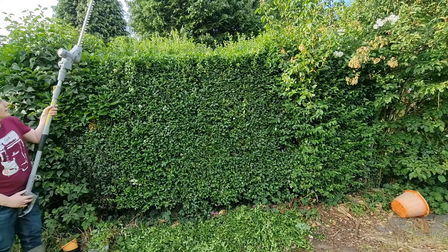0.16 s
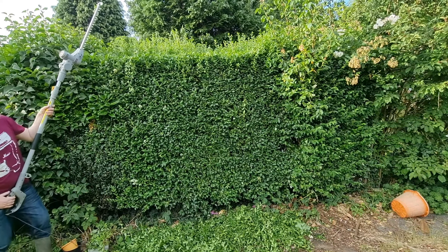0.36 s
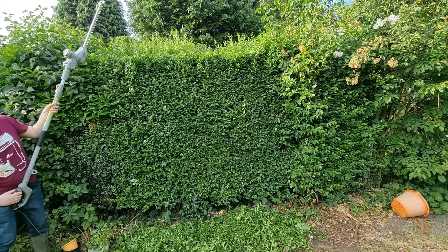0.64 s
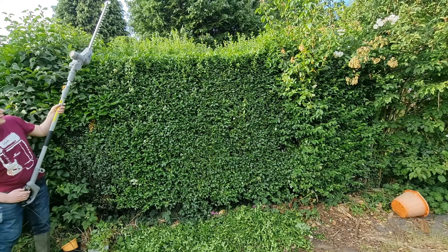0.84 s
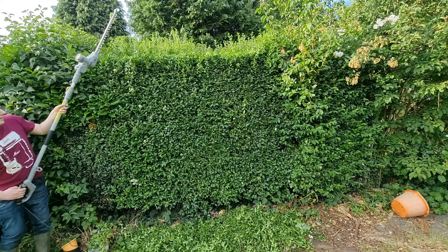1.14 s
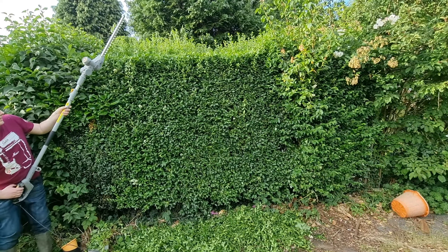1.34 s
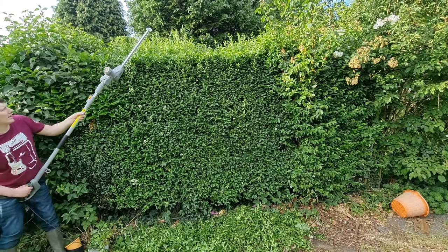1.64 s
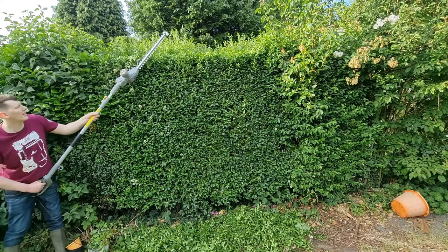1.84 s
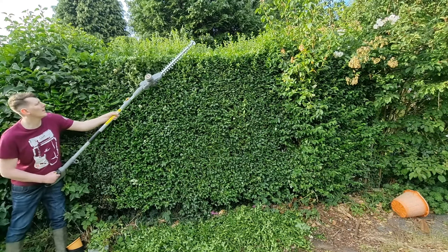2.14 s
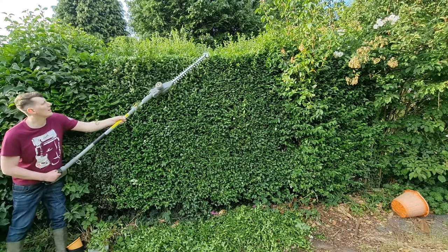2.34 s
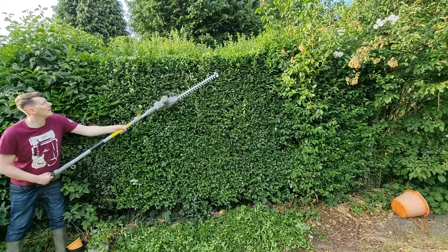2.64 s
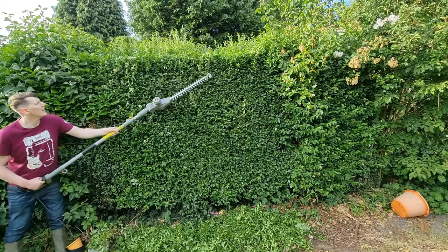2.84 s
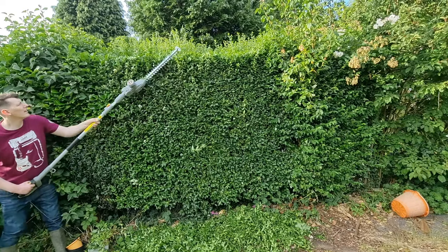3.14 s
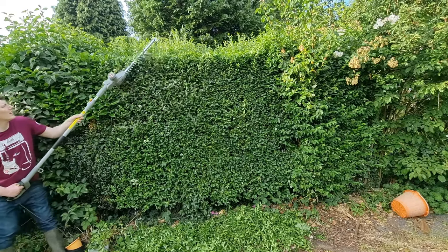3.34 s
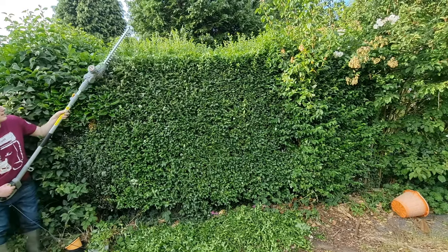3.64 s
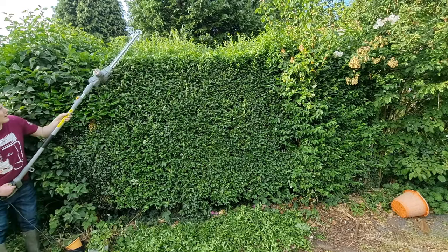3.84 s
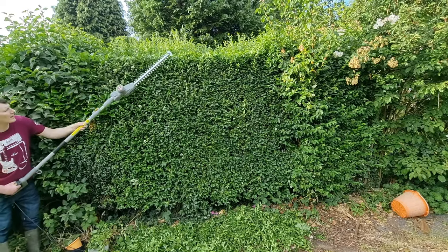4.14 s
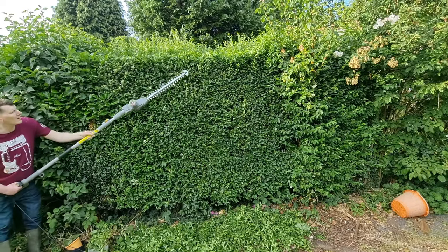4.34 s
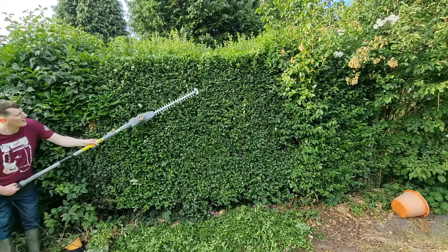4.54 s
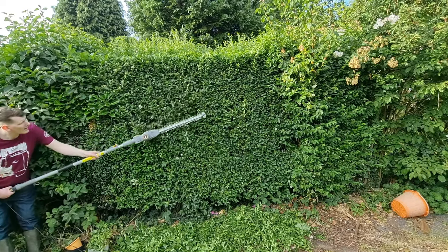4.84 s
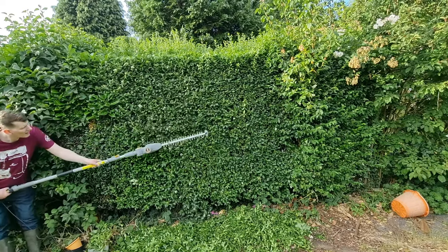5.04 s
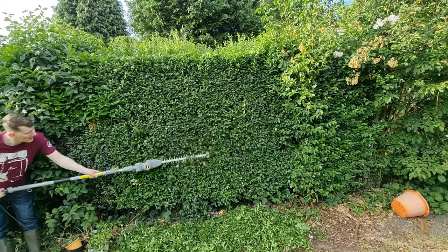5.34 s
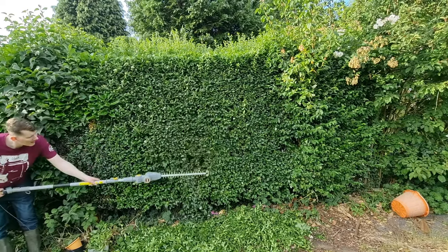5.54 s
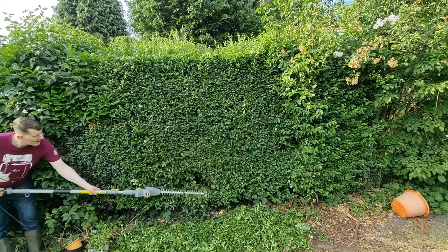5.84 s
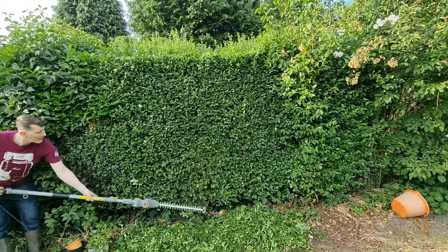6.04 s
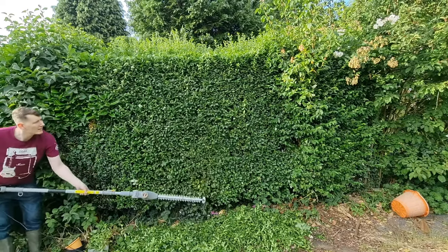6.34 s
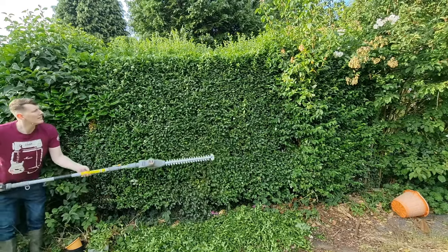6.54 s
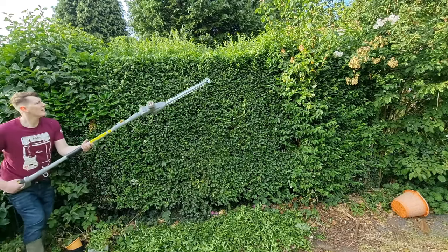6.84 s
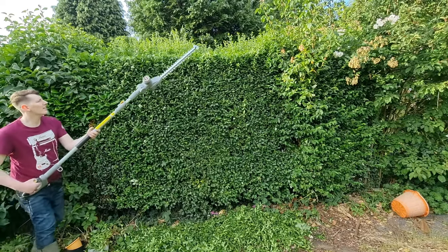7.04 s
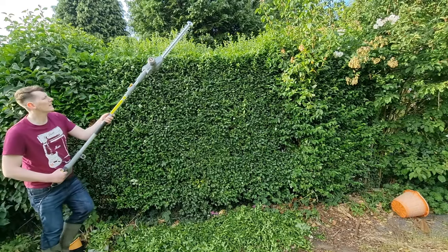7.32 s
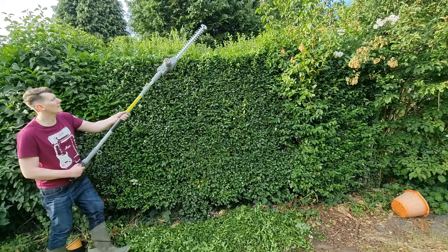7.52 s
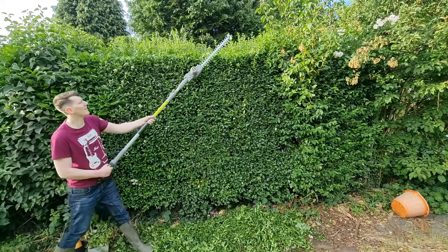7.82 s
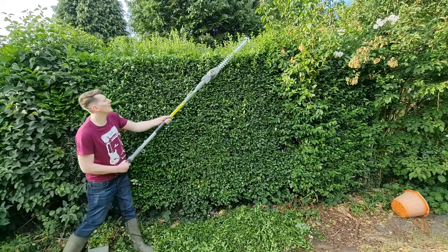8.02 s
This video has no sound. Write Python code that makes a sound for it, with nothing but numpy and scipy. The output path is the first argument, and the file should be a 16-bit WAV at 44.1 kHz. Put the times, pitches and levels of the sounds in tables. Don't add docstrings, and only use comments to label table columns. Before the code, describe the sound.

A near-silent outdoor opening holds soft leaf scrapes, small crisp ticks and a faint sleeve rub. Just after one second a long-reach electric trimmer switches on, quickly rising to a loud, dense, steady buzz with whining gears and rapidly chattering blades. Twigs crack, loudest past the middle, while lawn reflections give a sliding hollow colour. It never stops. Stereo pickup from a few metres, open air, little reverberation.

```python
import sys
import numpy as np
from scipy import signal
from scipy.fft import rfft, irfft, next_fast_len
from scipy.io import wavfile
from scipy.ndimage import uniform_filter1d, map_coordinates

SR = 44100
rng = np.random.default_rng(int(sys.argv[2]) if len(sys.argv) > 2 else 0)


def to_wav(sig):
    pcm = np.clip(np.atleast_2d(sig), -1, 1) * 32767
    pcm = np.round(pcm).astype(np.int16)
    wavfile.write(sys.argv[1], SR, pcm.T)


def convert_level_to_amplitude(level_db):
    exponent = np.asarray(level_db, float) / 20
    return 10 ** exponent


N = 360738
FULL_HZ = 430
STROKES_PER_TURN = 0.14
GEARS_ENGAGE_S = 1.183


# (time [s], speed [turns/s])
SPEED = [(1.27, 411), (1.38, 430), (1.65, 426), (1.95, 426), (2.25, 429.5), (2.6, 427.5), (3.3, 442),
         (3.5, 441.5), (3.9, 446), (4.3, 431.4), (4.5, 428.6), (4.7, 433.3), (5.1, 435.8), (5.9, 426),
         (6.1, 427.2), (6.45, 435), (7.3, 422.4), (8.18, 416.8)]


def motor():
    switch_s, switch_rise_s, spin_from_s, spin_up_s = 1.133, 0.008, 1.093, 0.19
    t = np.arange(N) / SR
    spin_up = 1 - np.exp(-np.maximum(t - spin_from_s, 0) / spin_up_s)
    hz = curve(SPEED)[0] * spin_up * np.clip((t - switch_s) / switch_rise_s, 0, 1)
    return hz, 2 * np.pi * np.cumsum(hz) / SR


# (time [s], shaft level [dB], gear level [dB])
WHINE = [(1.5, -34.5, -26), (2, -35.5, -23.5), (2.5, -39.5, -23.5), (3, -37.5, -27.5), (3.5, -39.5, -25),
         (4, -43.5, -25.5), (4.4, -33.5, -25.5), (4.8, -47, -27.5), (5.2, -41.5, -26), (5.6, -37, -26.5),
         (6.1, -37.5, -27), (6.45, -36, -30), (6.8, -38.5, -26), (7.2, -38, -23.5), (7.6, -39, -28),
         (8.18, -38, -28)]
# (multiple of shaft speed, level [dB], lower side tone [dB], upper side tone [dB])
MESH = [(2, -16, -12, -12), (3, -15, -12, -8), (4, -4.5, -7, -4), (5, 0, -6.5, -7), (6, -9, -1, -10),
        (7, -20, 0, -6), (10, -15, -14, -14), (11, -20, -3, -4), (12, -22, -9, -9), (14, -19, -7, -6),
        (15, -20, -5, -7)]


def whine(hz, turn):
    shaft_power, mesh_power = 2.8, 2.3
    commutator_bars, commutator_db = 40, -37
    shaft_db, mesh_db = curve(WHINE)
    stroke = STROKES_PER_TURN * turn
    speed = hz / FULL_HZ
    out = speed ** shaft_power * convert_level_to_amplitude(shaft_db + 0.81 * wander(hz=18)) * np.cos(turn)

    rising = (hz / 350) ** 3 * np.clip((402 - hz) / 25, 0, 1)
    brush_level = convert_level_to_amplitude(commutator_db + 2.5 * wander(hz=28)) * rising
    out += brush_level * np.cos(commutator_bars * turn + 0.8 * wander(hz=28))

    for k, db, lower_db, upper_db in MESH:
        angle = k * turn + 0.06 * k * wander(hz=8) + 2 * np.pi * rng.random()
        lower = convert_level_to_amplitude(lower_db + 1.6 * wander(hz=4))
        upper = convert_level_to_amplitude(upper_db + 1.6 * wander(hz=4))
        level = speed ** mesh_power * convert_level_to_amplitude(mesh_db + db + 1.6 * wander(hz=3))
        out += level * (np.cos(angle) + lower * np.cos(angle - stroke) + upper * np.cos(angle + stroke))
    first_turns = np.clip(turn / (2 * np.pi * 12), 0, 1) ** 2
    return np.sqrt(2) * out * first_turns


# (time [s], gear case nearness [dB], cutting load [dB], pole shake [dB])
WORK = [(1.24, -1.5, -0.5, 5), (1.45, 0.5, -4.5, 3), (1.72, 1, -2.5, 3), (2.15, -.5, -0.5, 3),
        (2.8, 0, 0.5, 3), (3.23, -0.5, 1, -1), (3.55, 1, -1, -3.5), (3.8, 1, -1.5, 3), (4.5, -.5, -1.5, -1),
        (5.5, 0, -0.5, 7.5), (5.9, 0.8, 0, -15), (6.4, -0.3, -2, -7), (7, 0.5, 1, 1), (7.4, -0.5, 1, -8),
        (8.18, -2, 0, -14)]
# (frequency [Hz], level [dB])
CASE = [(250, -32), (330, -8.5), (430, -8), (600, -3.5), (1400, 1), (2300, -2), (2900, -3.5), (4000, -10.5),
        (5500, -26.5)]
# (frequency [Hz], level [dB])
BLADES = [(2000, 0), (4000, 0), (6000, 1), (7500, -0.5), (8800, -2), (11000, -4.5), (12500, -2.5),
          (13700, -2.5), (15500, -8.5), (16300, -55)]
# (frequency [Hz], level [dB])
THRUM = [(120, -35), (170, -16), (200, -8), (260, -1.5), (330, 3.5), (420, -7)]
# (time [s], level [dB])
TWIGS = [(2.0122, -16), (2.2661, -17), (2.528, -12), (3.2938, -6), (4.053, -4), (4.4801, -17),
         (4.5883, -23), (5.535, 7.5), (5.85, 10), (5.8994, -6), (6.8267, -1.5), (6.913, -15), (7.3146, -11),
         (8.1638, 2.5)]


def cutter(hz, turn):
    case_db, blades_db, thrum_db, thrum_lumps_db = -19, -23, -49.5, 3.5
    blade_power, thrum_power = 1.82, 2.3
    engaged_s, engage_db_per_s = 1.206, 487
    near_db, load_db, shake_db = curve(WORK)
    stroke, speed, t = STROKES_PER_TURN * turn, hz / FULL_HZ, np.arange(N) / SR
    throb = evened(np.cos(stroke) + 0.059 * np.cos(stroke / 2 + 1) + 1.3 * np.cos(2 * stroke))

    rattle = convert_level_to_amplitude(0.39 * throb + 2.2 * np.cos(turn)) * crackle(3000, spread_db=2.5, share=0.34)
    case = evened(colour(rattle, CASE))
    slicing = convert_level_to_amplitude(0.35 * throb + 0.6 * wander(hz=13)) * crackle(2500, spread_db=5.0, share=0.22)
    blades = evened(colour(slicing, BLADES))
    thrum = evened(colour(rng.standard_normal(N), THRUM))
    twigs = convert_level_to_amplitude(-9.5) * colour(ticks(TWIGS, t60=0.0028), BLADES)

    slack = np.clip((t - GEARS_ENGAGE_S) / 0.014, 0.15, 1)
    not_engaged_db = engage_db_per_s * np.maximum(engaged_s - t, 0)
    case *= (hz > 0) * slack * convert_level_to_amplitude(case_db + near_db + 0.5 * wander(hz=2.5) - not_engaged_db)
    blades *= speed ** blade_power * convert_level_to_amplitude(blades_db + load_db)
    thrum *= slack * speed ** thrum_power * convert_level_to_amplitude(thrum_db + shake_db + thrum_lumps_db * wander(hz=8.3))
    return case + blades + thrum + twigs


# (start [s], hold [s], level [dB], crisp upper leaves [rel.
# dB], sleeve and pole [rel. dB])
RUSTLE = [
    (0, 0.064, -49, -3, -17.5),
    (0.4, .02, -55, -14, -21),
    (.5, 0.045, -62, -10, -17),
    (0.622, 0.055, -60, -9, -18),
    (0.685, 0.013, -56, -11, -4),
    (0.746, 0.017, -60, -3, -24),
    (0.78, 0.011, -44, -5, -25),
    (0.872, 0.0036, -74, 4, -28),
    (1.158, .008, -45, -14, -27),
]
# (frequency [Hz], level [dB])
LEAF = [(1800, -18.5), (2800, -6.5), (4000, -11), (5500, -5.5), (7500, -9), (9500, -23)]
# (frequency [Hz], level [dB])
CRISP = [(6500, -14), (8500, -5), (10000, -1), (13000, -2), (16000, -8)]
# (frequency [Hz], level [dB])
SLEEVE = [(150, -3), (300, 0), (800, 1), (1500, 2), (2500, -5), (3200, -21)]
# (time [s], level [dB])
SNAPS = [(0.0528, -22), (0.388, -50), (0.394, -41), (0.423, -46), (0.6449, -42), (0.6569, -40),
         (0.7472, -33.5), (0.7592, -29), (0.7776, -23), (0.783, -24), (0.8135, -26.5), (0.8599, -43),
         (0.8804, -41), (0.921, -56), (0.9767, -60), (0.9896, -56), (1.0874, -63), (1.1174, -56),
         (1.1378, -49)]


def rustle():
    rise_db_per_s, fall_db_per_s, stir_db, murmur_db = 802, 338, 4.5, -93
    start, hold, db, crisp_db, sleeve_db = np.transpose(RUSTLE)
    leaf = swells(start, hold, db, rise_db_per_s, fall_db_per_s)
    crisp = swells(start, hold, db + crisp_db, rise_db_per_s, fall_db_per_s)
    rub = swells(start, hold, db + sleeve_db, rise_db_per_s, fall_db_per_s)
    stir = convert_level_to_amplitude(curve(AIR)[0] + stir_db)
    grains = convert_level_to_amplitude(2.0 * wander(hz=28)) * crackle(900, spread_db=3.5, share=0.33)
    leaves = (leaf + stir) * evened(colour(grains, LEAF)) + (crisp + stir) * evened(colour(grains, CRISP))
    rub_level = rub + convert_level_to_amplitude(-4) * stir + convert_level_to_amplitude(murmur_db)
    sleeve = rub_level * evened(colour(rng.standard_normal(N), SLEEVE))
    snaps = ticks(SNAPS, t60=0.004)
    return leaves + sleeve + convert_level_to_amplitude(4.5) * (colour(snaps, LEAF) + colour(snaps, CRISP))


# (time [s], level [dB], pitch [Hz], time to fall 60 dB [s])
BUMPS = [(.4, -58, 88.5, .12), (.495, -55, 800, .05), (.525, -68, 870, .05), (0.686, -53, 260, .06),
         (.69, -47, 695, .05), (.976, -56, 5900, 0.087), (.99, -59, 6300, .08), (.2, -64, 6500, .08),
         (.26, -66, 95, .3), (3.74, -37, 160, .1), (3.765, -36, 189, 0.2), (7.38, -48, 180, .1),
         (7.9, -52, 75, .12), (8.172, -33, 120, .05)]


def bumps():
    out, t = np.zeros(N), np.arange(6000) / SR
    for (s, db, hz, t60), noise in zip(BUMPS, rng.standard_normal((len(BUMPS), 6000))):
        part = out[round(s * SR):][:6000]
        cycles = np.cumsum(hz * (1 + 0.9 * uniform_filter1d(noise, size=150))) / SR
        swell_in = np.minimum(t * hz / 2.2, 1) ** 2
        ring = convert_level_to_amplitude(db - 60 * t / t60) * swell_in * np.sin(2 * np.pi * cycles)
        part += ring[:len(part)]
    return out


# (time [s], right port lag [ms], ground bounce lag [ms])
PATH = [(.2, .25, 4.8), (.45, .21, 4.8), (1.25, .24, 4.8), (1.65, .21, 4.75), (2.45, .13, 4.48),
        (2.92, .113, 4.08), (3.5, .188, 4.54), (4.0, .214, 4.58), (4.45, .165, 4.23), (4.85, .152, 3.52),
        (5.25, .136, 2.8), (6.05, .134, 1.54), (6.35, .13, 1.22), (6.6, .127, 1.7), (7.1, .148, 4.1),
        (7.3, .146, 4.75), (7.65, .128, 4.9), (8.18, .04, 4.72)]
# (frequency [Hz], level [dB])
LAWN = [(200, -5), (1200, -9.5), (2500, -8), (4000, -13.5), (10000, -5.5)]
# (frequency [Hz], left minus right [dB])
PORTS = [(150, -3), (300, 1), (700, 1.5), (1400, 4), (2200, 0.5), (3500, 0.5), (5000, -2), (6500, -2.5),
         (8000, 4.5), (9500, 0.5), (11500, 4.5), (13000, -8), (15000, 7)]
# (time [s], extra scatter [dB])
BURIED = [(1.1, 1), (1.5, 4), (2.4, -2.5), (3.2, 0), (3.6, 0.5), (4.4, 4.5), (5, 3), (6.7, 4), (7.05, -0.5),
          (7.7, -2.5), (8.18, 4.5)]


def garden(tones, noises):
    port_ms, ground_ms = curve(PATH)
    x = tones + noises
    bounce = convert_level_to_amplitude(-0.6 * curve(BURIED)[0]) * colour(x, LAWN, shut=False)
    left = x + late(bounce, ground_ms)
    right = far_port(x + late(bounce, ground_ms - 0.46 * port_ms), port_ms)
    # whine, bumps and whistle scatter 8 dB less than the noises, so they stay clear
    both = np.array([left, right]) + scatter(convert_level_to_amplitude(-8) * tones + noises)
    f, db = np.transpose(PORTS)
    left_shape, right_shape = np.transpose([f, db / 2]), np.transpose([f, -db / 2])
    return np.array([colour(both[0], left_shape, shut=False), colour(both[1], right_shape, shut=False)])


# (frequency [Hz], factor on the port lag)
BEND = [(350, 1.9), (700, 1.75), (1400, 1.15), (2050, .95), (2750, 1.08), (3450, 1.12), (4150, .99),
        (4800, .93), (5900, 1.0), (7200, 1.05), (9000, 1.01)]


def far_port(x, ms):
    hz, t, z = signal.stft(x, SR, nperseg=512, noverlap=384)
    f, bend = np.transpose(BEND)
    lag_s = np.outer(np.interp(hz, f, bend), np.interp(t * SR, np.arange(N), ms)) / 1000
    delayed = z * np.exp(-2j * np.pi * hz[:, None] * lag_s)
    return signal.istft(delayed, SR, nperseg=512, noverlap=384)[1][:N]


# (frequency [Hz], level [dB])
SCATTER = [(250, -23.5), (600, -9.5), (1400, -11.5), (2100, -13), (3500, -6.5), (5000, -3.5), (7200, -7.5),
           (9500, -5.5), (12000, -1.5), (15000, 0)]


def scatter(x):
    z = signal.stft(convert_level_to_amplitude(curve(BURIED)[0]) * x, nperseg=256, noverlap=192)[2]
    power = uniform_filter1d(uniform_filter1d(abs(z) ** 2, size=3, axis=1), size=3, axis=0)
    size = np.sqrt(np.abs(power))
    a, b = rng.standard_normal((2, 2) + z.shape)
    mixed = signal.istft(size * (a + 1j * b), nperseg=256, noverlap=192)[1][:, :N]
    return np.sqrt(2) * colour(mixed, [(180, -49)] + SCATTER, shut=False)


# (time [s], pitch [Hz], level [dB])
WHISTLE = [
    (.15, 1700, -100),
    (.25, 1710, -82),
    (.4, 1700, -75),
    (.5, 1700, -74),
    (.58, 1690, -100),
]


def whistle():
    hz, db = curve(WHISTLE)
    angle = 2 * np.pi * np.cumsum(hz) / SR
    return convert_level_to_amplitude(db + 3.0 * wander(hz=25)) * np.sin(angle + 1.2 * wander(hz=28))


# (start [s], hold [s], level [dB])
RUMBLE = [(.06, .03, -73), (.27, .02, -82), (.4, .03, -69), (.78, .1, -75), (1.21, .05, -68),
          (1.62, .02, -78), (1.81, .03, -65), (2.51, .05, -70), (3.77, .03, -67), (4.07, .04, -65),
          (4.95, .14, -67), (5.45, .05, -67), (6.0, .03, -64), (7.92, .03, -62.5), (8.16, .03, -69)]
# (frequency [Hz], level [dB])
TRAFFIC = [(15, -28), (25, -12), (40, -8), (65, -1.5), (100, -5.5), (130, -8.5), (170, -23)]
# (time [s], level [dB])
AIR = [
    (0, -82),
    (.2, -82),
    (.35, -83),
    (.8, -86),
    (.95, -92),
    (1.05, -105),
]


def traffic():
    idle_db, running_db = -88, -72
    a = evened(colour(rng.standard_normal(N), TRAFFIC))
    b = evened(colour(rng.standard_normal(N), TRAFFIC))
    t = np.arange(N) / SR
    bed_db = np.where(t < GEARS_ENGAGE_S, idle_db, running_db) + 1.5 * wander(hz=5)
    passing = swells(*np.transpose(RUMBLE), rise_db_per_s=150, fall_db_per_s=150)
    level = np.hypot(convert_level_to_amplitude(bed_db), passing)
    hiss = convert_level_to_amplitude(curve(AIR)[0]) * rng.standard_normal((2, N))
    return level * np.array([a + 0.22 * b, a - 0.2 * b]) + hiss


def evened(x):
    return x / np.sqrt(np.mean(x ** 2) + 1e-20)


def curve(rows):
    s, *columns = np.transpose(rows)
    return [np.interp(np.arange(N) / SR, s, c) for c in columns]


def colour(x, points, shut=True):
    size = next_fast_len(N)
    hz = np.fft.rfftfreq(size, 1 / SR)
    f, db = np.transpose(points)
    gain = convert_level_to_amplitude(np.interp(np.log(hz + 1), np.log(f + 1), db))
    gain = gain * ((hz >= f[0]) & (hz <= f[-1]) | (not shut))
    return irfft(rfft(x, size) * gain, size)[..., :N]


def wander(hz):
    knots = rng.standard_normal(int(N / SR * 60) + 2)
    slow = evened(signal.filtfilt(*signal.butter(1, min(hz, 29) / 30), knots))
    return np.interp(np.arange(N) / SR * 60, np.arange(len(knots)), slow)


def crackle(per_s, spread_db, share):
    size = convert_level_to_amplitude(spread_db * np.minimum(rng.exponential(1, N), 5)) * np.sign(rng.random(N) - 0.5)
    clicks = evened(size * (rng.random(N) < per_s / SR))
    return np.sqrt(1 - share) * rng.standard_normal(N) + np.sqrt(share) * clicks


def ticks(events, t60):
    out, t = np.zeros(N), np.arange(800) / SR
    for (s, db), noise in zip(events, rng.standard_normal((len(events), 800))):
        part = out[round(s * SR):][:800]
        part += (convert_level_to_amplitude(db - 60 * t / t60) * noise)[:len(part)]
    return out


def late(x, ms):
    return map_coordinates(x, [np.arange(N) - ms * SR / 1000], order=3)


def swells(start, hold, db, rise_db_per_s, fall_db_per_s):
    at = np.arange(0, N, 32)
    t = at / SR - start[:, None]
    drop = rise_db_per_s * np.maximum(-t, 0) + fall_db_per_s * np.maximum(t - hold[:, None], 0)
    level = convert_level_to_amplitude(db[:, None] - np.minimum(drop, 200)).sum(axis=0)
    return np.interp(np.arange(N), at, level)


def scene():
    hz, turn = motor()
    tones = whine(hz, turn) + bumps() + whistle()
    noises = cutter(hz, turn) + rustle()
    return garden(tones, noises) + traffic()


def roll_off(x):
    return signal.sosfilt(signal.butter(12, 16270, fs=SR, output="sos"), x)


def record(dry):
    mix = np.clip(dry, -1, 1)
    return roll_off(mix)


dry = scene()
out = record(dry)
to_wav(out)
```